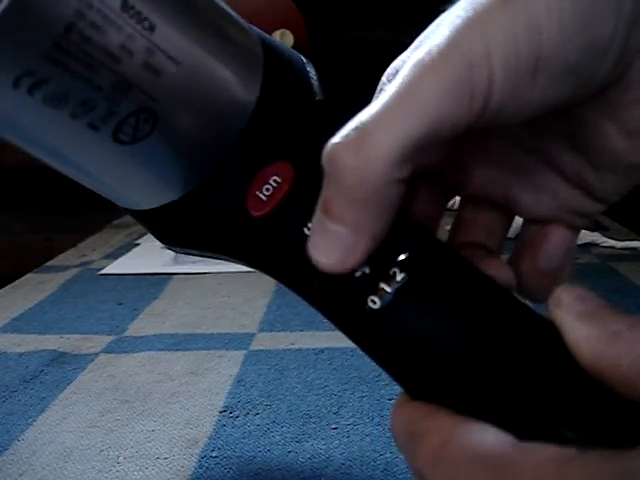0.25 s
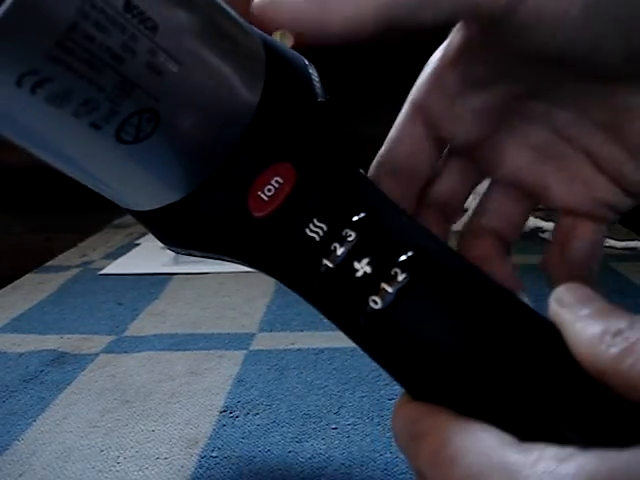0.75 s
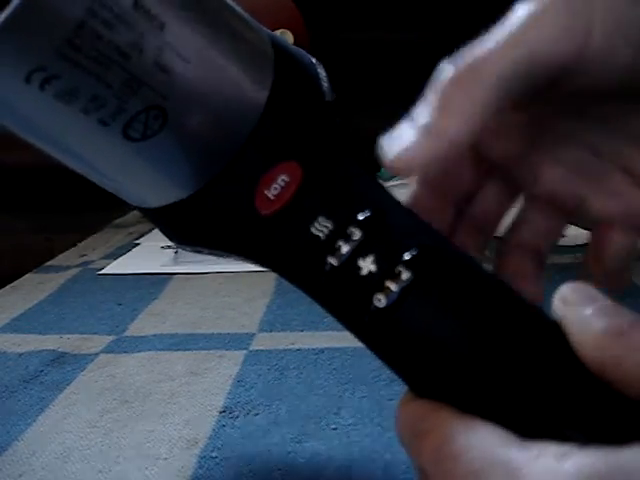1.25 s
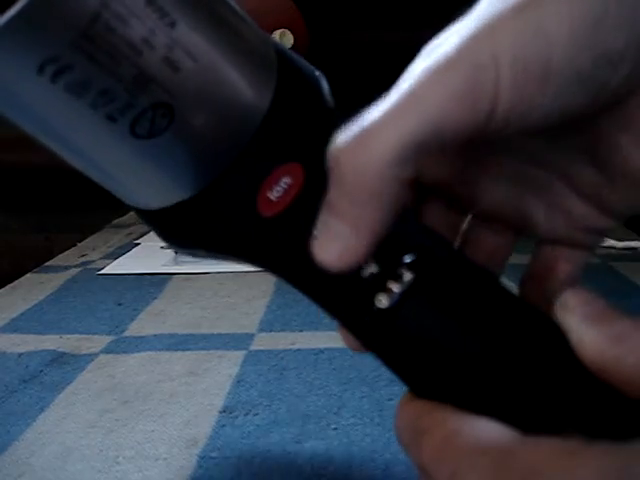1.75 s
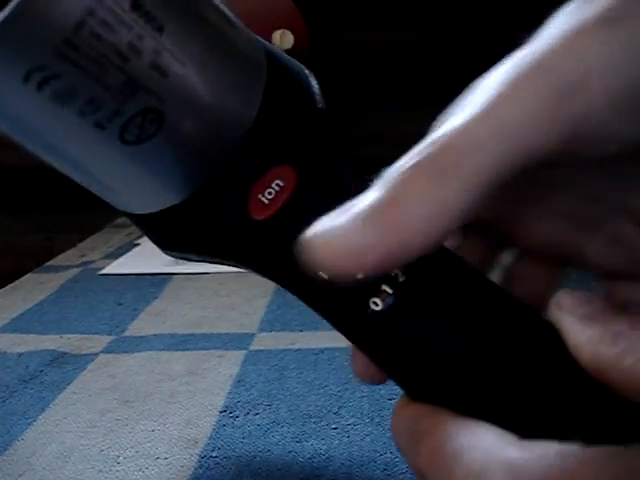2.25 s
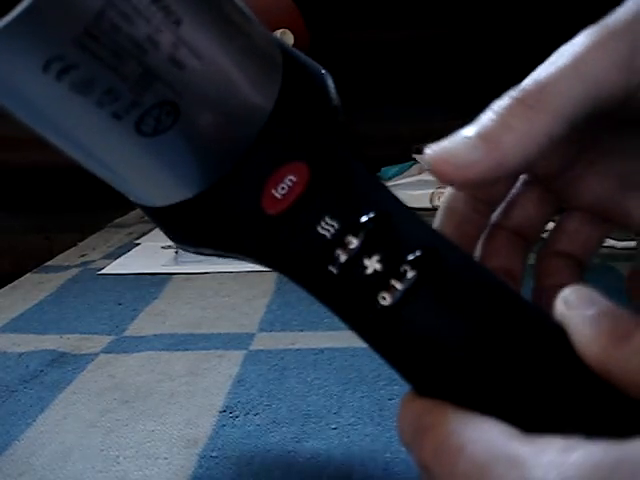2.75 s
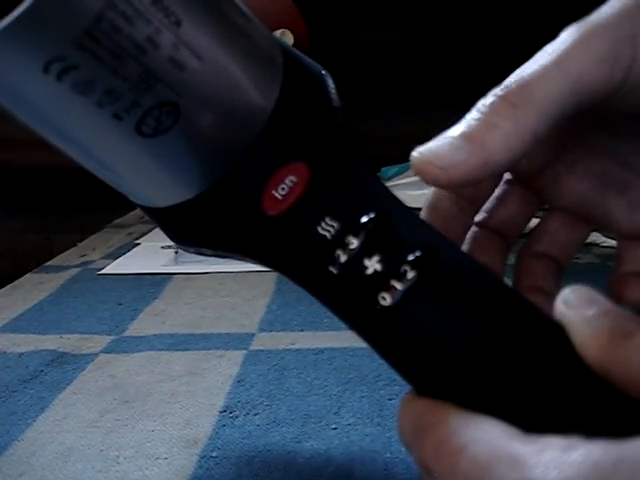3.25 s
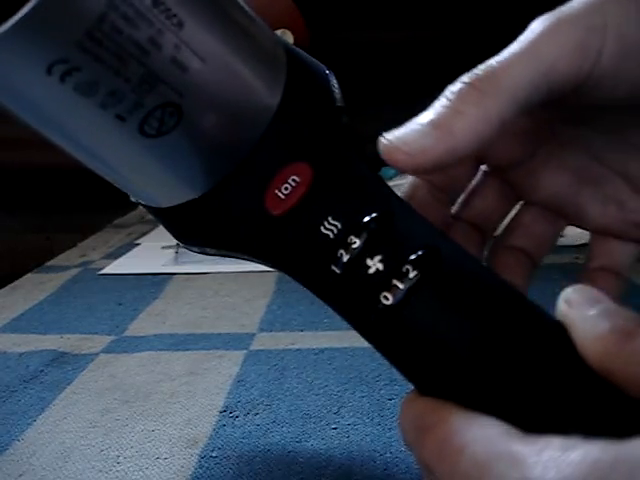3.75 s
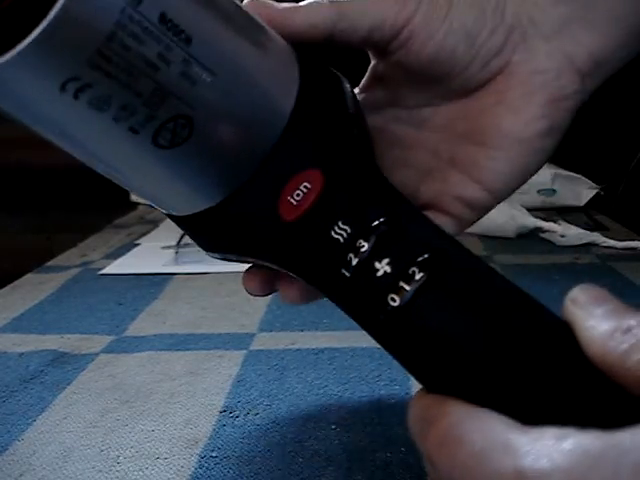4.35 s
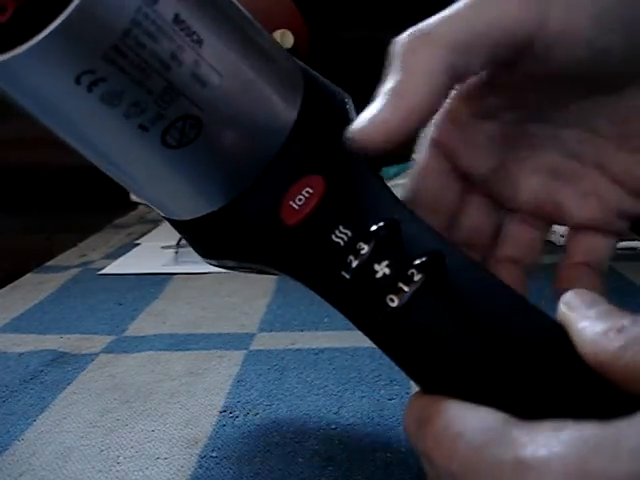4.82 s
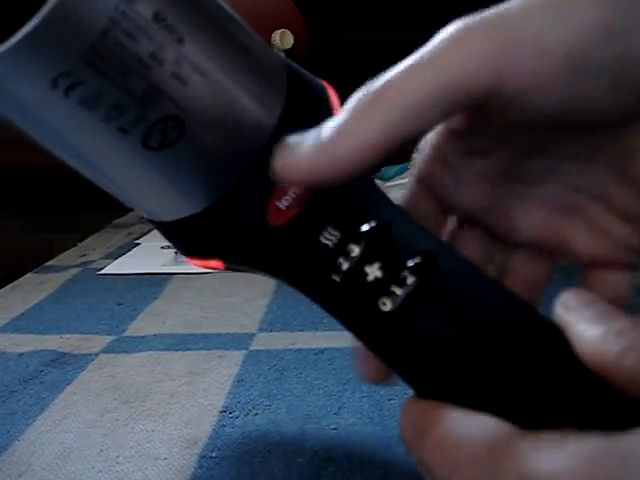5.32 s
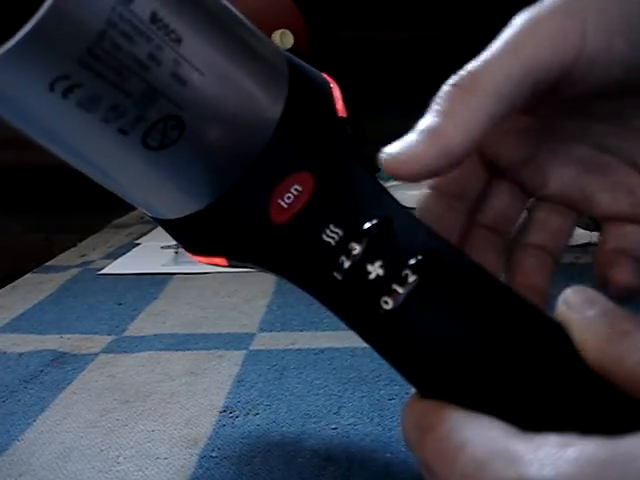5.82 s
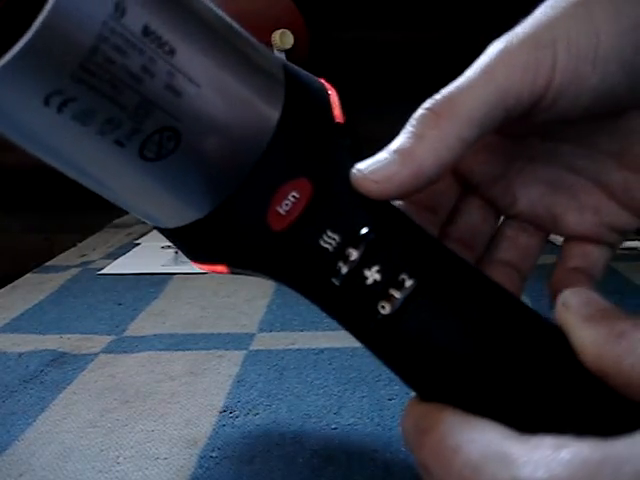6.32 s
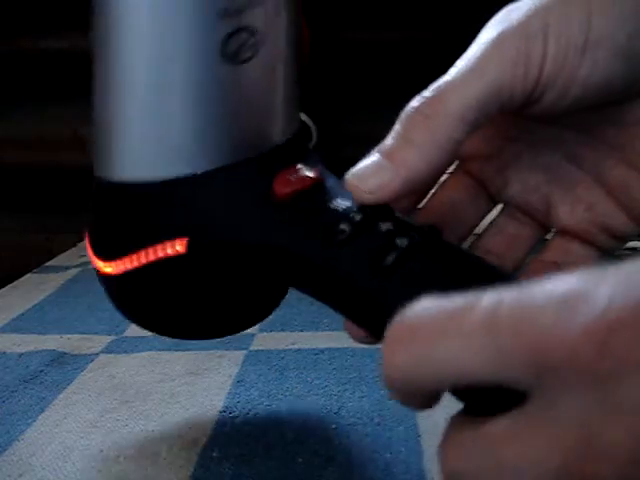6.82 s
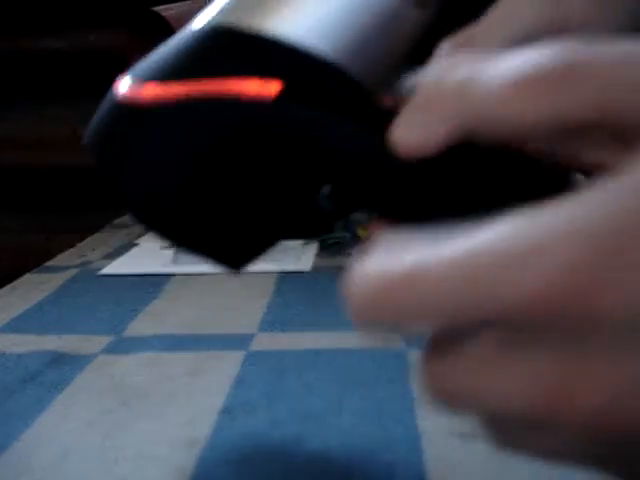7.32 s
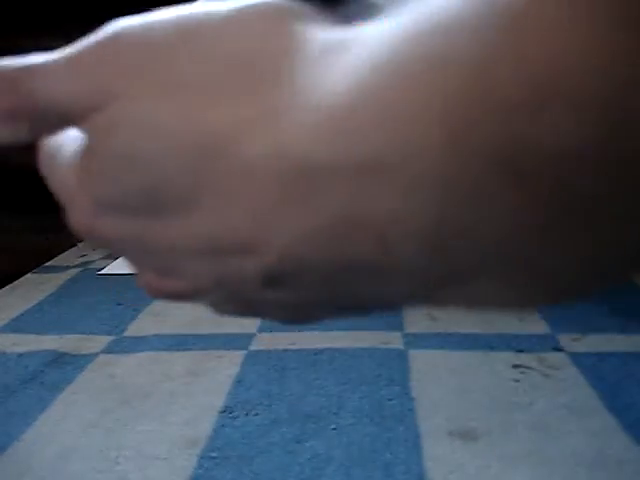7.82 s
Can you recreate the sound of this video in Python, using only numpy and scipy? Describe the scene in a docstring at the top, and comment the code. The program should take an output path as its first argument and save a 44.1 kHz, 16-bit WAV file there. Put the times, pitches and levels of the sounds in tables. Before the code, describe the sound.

A hair dryer is already running on high very close to a small microphone in a room: a strong, slightly wavering motor whine with a noisy whistle, inside broad rushing air. At about 0.5 s it is switched down, and the whine slides smoothly lower, settling by roughly 1.5-2 s. The lower whir holds steady with a faint rough beating, while soft dull handling bumps come irregularly, mostly from 1.8 to 4.6 s. Around 4.1-4.6 s a hand near the inlet makes the whistle swell, then drop out briefly. At 5.1 s a hard button snap bursts out and the fan ducks with a thump; a tight cluster of lighter clicks follows at 5.3 s. The fan continues. From 6.7 s the inlet turns to the microphone: hollow, boomier, less bright, with narrow airy whistles at 6.7, 7.0-7.3 and 7.7-8.0 s as a hand cups it. It is still running at the end.

```python
"""A hand-held hair dryer close to a small microphone indoors, the same signal on both channels.
Rotor sines and a noisy whistle stand out of coloured noise, the rushing air; soft low bumps come and go.
It is switched down and the fan coasts to a lower speed; later a hand hovers beside the inlet.
A button snaps as short pulses, and a limiter ducks on the snap. Then the inlet is turned to the
microphone and a hand cups over it: the gap sings as narrow noise."""
import sys
import numpy as np
from scipy import signal
from scipy.fft import rfft, irfft, next_fast_len
from scipy.io import wavfile

SR = 44100
rng = np.random.default_rng(int(sys.argv[2]) if len(sys.argv) > 2 else 0)


def store_pcm(level_fs):
    """Save levels as 16-bit WAV."""
    pcm = np.round(np.clip(level_fs, -1, 1) * 32767).astype(np.int16)
    wavfile.write(sys.argv[1], SR, np.atleast_2d(pcm).T)


N = 355887
T = np.arange(N) / SR

# Shaft speed on the low step, shifting with the air load: time_s, speed_hz
LOW_STEP_SPEED = [(0, 178.1), (3, 178.15), (4, 178.0), (4.5, 177.5), (5.5, 178.0), (6.5, 178.0), (7, 178.6),
                  (7.6, 178.5), (8.07, 178.0)]
# Aim of the dryer: time_s, facing (0 side-on, 1 inlet to the microphone)
AIM = [(0, 0.024), (6.7, 0.064), (7.0, 0.71), (8.07, 1)]
# Two strongest rotor tones: time_s, order_4_rms_db, order_8_rms_db
MAIN_TONES = [(0, -25.5, -24.5), (.6, -26.5, -26), (.72, -35.5, -25.5), (1.05, -31, -28),
              (1.35, -34.5, -29.5), (2.0, -30.5, -29.5), (3.9, -32, -28), (4.6, -33.5, -32),
              (5.0, -33.5, -27), (5.4, -35, -30), (6.6, -33.5, -28.5), (6.77, -32, -32), (6.9, -38, -33),
              (7.05, -35, -44), (7.35, -28.5, -34), (7.6, -33.5, -36), (8.07, -27, -39)]
# Weaker rotor tones: shaft_order, high_rms_db, low_rms_db, facing_rms_db, coasting_dip_db, waver_db
WEAK_TONES = [(1, -61, -59.5, -56, 7, 1.8), (2, -49, -62, -60, 5, 5), (5, -54, -39.5, -41, 3, 2.5),
              (6, -60, -49, -47.5, 4, 2), (7, -35, -35, -63.5, 17, 1), (10, -57, -57.5, -54, 0.5, 4),
              (12, -46, -40.5, -45, 2, 3.5), (16, -56, -45, -45, 0.5, 2), (20, -52.5, -49.5, -49.5, 0.1, 2),
              (24, -44.5, -48, -49, 2, 3), (25, -61, -48.5, -60, 2, 4.5), (30, -45, -51, -58.5, 6, 5)]
# Rushing air before the treble share: time_s, level_2600_to_5000_hz_db, bass_share_db
AIR_LEVEL = [(0.0, -28, -7), (.45, -29, -5.5), (1.2, -30.5, -1), (2.56, -28, 1.5), (3.71, -28, 1.5),
             (4.54, -27.5, 2.5), (4.72, -29, 2), (4.95, -28.5, 4), (5.3, -28.5, -1.5), (6.7, -29.5, 2),
             (7.33, -32.5, 4), (7.4, -31, 4), (8.07, -29.5, 5.5)]
# Relative spectral density of the air: frequency_hz, side_on_db, facing_db
AIR_COLOUR = [(100, -33, -48), (168, -21.5, -30), (264, -14.5, -17.5), (450, -5.5, -10.5), (626, -6.5, -13),
              (870, -4.5, 5), (1090, -1.5, -7.5), (1550, 1.5, -2.5), (2400, 2, -7.5), (3200, -1.5, -6),
              (4300, -7.5, -9), (6900, -5.5, -11), (7460, -8.5, -15), (9700, -11.5, -17.5)]
# Resonances of casing and microphone: centre_hz, width_hz, side_on_db, facing_db
CASING_RESONANCES = [(483, 150, 1.5, 9.5), (1330, 180, -2, 4), (2110, 420, -4.5, 0), (2910, 280, 0.5, 1.5),
                     (3320, 180, -3.5, -5), (3670, 560, 3.5, 7), (4370, 220, 3, 0.5),
                     (5440, 1350, 4.5, 4.5), (8180, 1100, 2.5, 0)]
# Treble share of the air: high_step_db, low_step_db, facing_db
TREBLE_SHARE = (0.88, -1.36, -2.2)
# Noisy resonances, one row each: high_rms_db, low_rms_db, facing_rms_db, hover_change_db, waver_db
WHISTLE = (-36, -32, -41.5, -2, 0.54)
BOOM = (-44.5, -45, -31, -3, 2.5)
BARREL = (-34, -33.5, -55, 4, -0.1)
# Brief changes of the resonances, strongest with the hand near the inlet:
# centre_s, length_s, whistle_db, boom_db, barrel_db
SURGES = [(.65, .3, 1, 3, -2), (2.15, .3, -1.5, 3, -2), (3.0, 0.33, 2.5, -2, 1.5), (4.08, 0.16, 5, -4, 1.5),
          (4.327, 0.17, -17, -6, 3.5), (4.85, .3, 1.5, 2, -.5), (5.1, .2, 1.5, 8, 3),
          (6.6, 0.32, 0.5, 5.5, 2), (7.31, .25, 8.5, 2.5, 17), (7.577, 0.11, 12, 5.5, 9),
          (7.68, 0.13, 6.5, 0, 16), (7.887, 0.17, 7.5, 5, 0.5)]
# Soft low bumps: start_s, peak_db
BUMPS = [(.21, -54), (1.85, -49), (2.34, -41), (2.54, -51), (2.83, -50), (2.92, -45), (3.14, -50),
         (3.34, -44), (3.56, -46), (3.75, -48), (4.04, -48), (4.11, -50), (4.19, -40), (4.26, -48),
         (4.62, -50), (5.91, -50)]
# Rectified mains beating with rotor tones on the low step: shaft_order, offset_hz, side_on_rms_db, facing_rms_db
MAINS_BEATS = [(4, 50, -46.5, -42), (8, 50, -44.5, -58.5), (45, 50, -66, -71.5), (47, -50, -61.5, -68),
               (54, -50, -61.5, -70), (54, 50, -54.5, -62.5)]
# Button snaps: centre_s, peak_db, ring_hz, length_cycles
SNAPS = [(5.11265, -2, 2600, .22), (5.3031, -7, 5200, .5), (5.3083, -6.5, 3700, .4), (5.3167, -8, 3200, .4)]
# Singing gap between hand and inlet: start_s, end_s, first_hz, last_hz, rms_db
HAND_GAPS = [(6.695, 6.802, 2850, 3020, -32), (6.947, 7.303, 1740, 1610, -34.5),
             (7.24, 7.3, 5800, 5730, -37), (7.66, 8.02, 2846, 2940, -34.5)]

HIGH_STEP_HZ, SWITCH_S, COAST_S = 231.6, .462, .358
WHISTLE_ORDER_HIGH, WHISTLE_ORDER_LOW, WHISTLE_WIDTH_HZ = 5.67, 5.54, 22
BOOM_HZ, BOOM_WIDTH_HZ = 813.6, 285
BARREL_HZ, BARREL_WIDTH_HZ = 2189, 446
HOVER_START_S, HOVER_END_S, HOVER_FADE_S = 4.05, 4.65, .17
RUMBLE_RMS_DB, RUMBLE_CUTOFF_HZ = -69.5, 151
BUMP_RISE_S = .0029
HUM_HZ, HUM_PEAK_DB = 101, -70.5
GAP_WIDTH_HZ, GAP_FADE_S = 210, .054
LIMIT_DB, SENSE_HZ, ATTACK_S = -10.4, 1200, .0012
FAST_RELEASE_DB_PER_S, DUCK_DB_PER_DB_OVER = 260, 1.6
SLOW_RELEASE_DB_PER_S, SLOW_SHARE = 2.5, .3
AMPLIFIER_OFFSET = -.028  # standing, full scale 1
COUPLING_HZ, CUTOFF_HZ = 3.5, 10000


def from_db(db):
    """Decibels to gain."""
    return 10 ** (np.asarray(db) / 20)


def rms_one(x):
    """Scale to rms 1."""
    return x / np.sqrt(np.mean(np.abs(x) ** 2))


def in_time(rows):
    """Table columns as curves over all samples."""
    time_s, *columns = np.transpose(rows)
    return [np.interp(T, time_s, column) for column in columns]


def blend(first, second, share):
    """From one value to another."""
    return first + (second - first) * share


def window(start_s, end_s, fade_s):
    """1 between start and end, fading to 0 outside."""
    return np.clip(np.minimum(T - start_s, end_s - T) / fade_s + 1, 0, 1) ** 2


def highpass(x, order, cutoff_hz):
    """Butterworth high-pass."""
    return signal.sosfilt(signal.butter(order, cutoff_hz, "high", fs=SR, output="sos"), x)


def lowpass(x, order, cutoff_hz):
    """Butterworth low-pass."""
    return signal.sosfilt(signal.butter(order, cutoff_hz, fs=SR, output="sos"), x)


def phase_of(hz):
    """Running phase of a frequency curve."""
    return 2 * np.pi * np.cumsum(hz * np.ones(N)) / SR


def tone(phase):
    """Sine of rms 1 with a random starting phase."""
    return np.sqrt(2) * np.sin(phase + rng.uniform(0, 2 * np.pi))


def drift(rate_hz):
    """Slow random curve of rms 1: noise through two equal poles, computed every 40 samples."""
    step = 40
    pole = np.exp(-2 * np.pi * rate_hz * step / SR)
    settle = 2000
    white = rng.standard_normal(N // step + settle + 2)
    slow = signal.lfilter([1], [1, -2 * pole, pole ** 2], white)[settle:]
    return np.interp(np.arange(N) / step, np.arange(len(slow)), rms_one(slow))


def resonant_noise(centre_hz, width_hz, order=3):
    """Low-passed complex noise shifted to a centre that may move; rms 1."""
    white = rng.standard_normal(N) + 1j * rng.standard_normal(N)
    slow = lowpass(white, order, width_hz / 2)
    return rms_one(np.real(slow * np.exp(1j * phase_of(centre_hz))))


def coast():
    """Share of the high step left in the speed: 1, then exponential decay after the switch."""
    return np.exp(-np.maximum(T - SWITCH_S, 0) / COAST_S)


def by_state(high, low, turned, facing):
    """A value that depends on fan step and aim."""
    return blend(blend(low, high, coast() ** .5), turned, facing)


def rotor_tones(speed_hz, facing):
    """Sines on multiples of the shaft speed, each wavering on its own."""
    shaft_phase = phase_of(speed_hz)
    coasting = (6.75 * coast() * (1 - coast()) ** 2) ** .7  # peaks at 1 during the coast
    out = np.zeros(N)
    for order, db in zip((4, 8), in_time(MAIN_TONES)):
        out += from_db(db + .65 * drift(4)) * tone(order * shaft_phase)
    for order, high_db, low_db, facing_db, dip_db, waver_db in WEAK_TONES:
        db = by_state(high_db, low_db, facing_db, facing) - dip_db * coasting
        out += from_db(db + waver_db * drift(8)) * tone(order * shaft_phase)
    return out


def air(facing):
    """One rush of noise in two colours, side-on and inlet facing, with moving bass and treble shares."""
    level_db, bass_db = in_time(AIR_LEVEL)
    treble_db = by_state(*TREBLE_SHARE, facing) + .68 * drift(25)
    size = next_fast_len(N)
    hz = np.maximum(np.fft.rfftfreq(size, 1 / SR), 1)
    white = rfft(rng.standard_normal(size))
    bass = 1 / (1 + (hz / 750) ** 4)
    treble = 1 / (1 + (5000 / hz) ** 4)
    bands = bass, 1 - bass - treble, treble
    gains = from_db(bass_db), 1, from_db(treble_db)
    reference = (hz > 2600) & (hz < 5000)
    colour_hz, *colours = np.transpose(AIR_COLOUR)
    views = []
    for view, db in enumerate(colours):
        colour_db = np.interp(np.log(hz), np.log(colour_hz), db)
        for centre_hz, width_hz, *peaks_db in CASING_RESONANCES:
            colour_db += peaks_db[view] / (1 + (2 * (hz - centre_hz) / width_hz) ** 2)
        rush = white * from_db(colour_db)
        rush /= np.sqrt(2 * np.sum(np.abs(rush[reference]) ** 2)) / size  # rms 1 in the reference band
        views.append(sum(gain * irfft(rush * band, size)[:N] for gain, band in zip(gains, bands)))
    return from_db(level_db + .22 * drift(3.7)) * blend(*views, facing)


def radiate(x):
    """Small cavities radiate no bass."""
    return highpass(x, 2, 400)


def resonances(speed_hz, facing):
    """Noise in narrow bands: whistle following the fan, boom of the inlet, hiss of the barrel."""
    hover = window(HOVER_START_S, HOVER_END_S, HOVER_FADE_S)
    surges_db = np.zeros((3, N))
    for centre_s, length_s, *changes_db in SURGES:
        surges_db += np.outer(changes_db, np.exp(-.5 * (2 * (T - centre_s) / length_s) ** 2))
    whistle_order = blend(WHISTLE_ORDER_LOW, WHISTLE_ORDER_HIGH, coast())
    sources = (resonant_noise(whistle_order * speed_hz, WHISTLE_WIDTH_HZ, order=1),
               resonant_noise(BOOM_HZ, BOOM_WIDTH_HZ),
               resonant_noise(BARREL_HZ, BARREL_WIDTH_HZ))
    out = np.zeros(N)
    for source, row, surge_db in zip(sources, (WHISTLE, BOOM, BARREL), surges_db):
        high_db, low_db, facing_db, hover_db, waver_db = row
        db = by_state(high_db, low_db, facing_db, facing)
        db = db + hover_db * hover + waver_db * drift(8) + surge_db
        out += from_db(db) * source
    return radiate(out)


def rumble():
    """Faint low-passed noise of room and amplifier."""
    return from_db(RUMBLE_RMS_DB) * rms_one(lowpass(rng.standard_normal(N), 2, RUMBLE_CUTOFF_HZ))


def bumps():
    """Each bump swells and sinks once, without ringing."""
    out = np.zeros(N)
    for start_s, peak_db in BUMPS:
        x = np.maximum(T - start_s, 0) / BUMP_RISE_S
        out += from_db(peak_db) * np.e * x * np.exp(-x)
    return out


def mains_beats(speed_hz, facing):
    """Rectified mains beats with rotor tones: sines offset from shaft orders, rising as the fan coasts down."""
    shaft_phase = phase_of(speed_hz)
    out = np.zeros(N)
    for order, offset_hz, side_db, facing_db in MAINS_BEATS:
        db = blend(side_db, facing_db, facing) + 2.5 * drift(1.5)
        out += from_db(db) * tone(order * shaft_phase + phase_of(offset_hz))
    return (1 - coast()) * out


def heater_hum():
    """Sine near twice the mains, from the heater on the low step."""
    return (1 - coast()) * from_db(HUM_PEAK_DB + 2 * drift(3)) * np.sin(phase_of(HUM_HZ))


def button():
    """Each snap is a sharp pull between two small pushes: a cosine under a Gaussian."""
    out = np.zeros(N)
    for centre_s, peak_db, ring_hz, length_cycles in SNAPS:
        cycles = (T - centre_s) * ring_hz
        out -= from_db(peak_db) * np.cos(2 * np.pi * cycles) * np.exp(-.5 * (cycles / length_cycles) ** 2)
    return out


def hand_gaps():
    """The gap between hand and inlet sings: narrow noise gliding in pitch."""
    out = np.zeros(N)
    for start_s, end_s, first_hz, last_hz, rms_db in HAND_GAPS:
        hz = np.interp(T, [start_s, end_s], [first_hz, last_hz])
        song = resonant_noise(hz, GAP_WIDTH_HZ, order=2)
        out += from_db(rms_db) * window(start_s, end_s, GAP_FADE_S) * song
    return radiate(out)


def scene():
    """Sum of all sources, the same signal on both channels."""
    low_hz, = in_time(LOW_STEP_SPEED)
    facing = np.clip(in_time(AIM)[0], 0, 1)
    speed_hz = blend(low_hz, HIGH_STEP_HZ, coast())
    mono = rotor_tones(speed_hz, facing) + air(facing) + resonances(speed_hz, facing)
    mono += rumble() + bumps() + mains_beats(speed_hz, facing) + heater_hum()
    mono += button() + hand_gaps()
    return np.array([mono, mono])


def release(duck_db, rate_db_per_s):
    """Jump up with the input, fall at a constant rate in dB."""
    return np.maximum.accumulate(duck_db + rate_db_per_s * T) - rate_db_per_s * T


def record(dry):
    """Limiter with two releases on signal plus offset, so each duck thumps; then coupling and treble cutoff."""
    sensed = highpass(dry[0], 1, SENSE_HZ)  # it listens to the treble
    over_db = np.maximum(20 * np.log10(np.abs(sensed) + 1e-9) - LIMIT_DB, 0)
    target_db = DUCK_DB_PER_DB_OVER * over_db
    fast_db = release(target_db, FAST_RELEASE_DB_PER_S)
    slow_db = release(SLOW_SHARE * target_db, SLOW_RELEASE_DB_PER_S)
    pole = np.exp(-1 / (ATTACK_S * SR))
    duck_db = signal.lfilter([1 - pole], [1, -pole], np.maximum(fast_db, slow_db))
    limited = (dry + AMPLIFIER_OFFSET) * from_db(-duck_db) - AMPLIFIER_OFFSET
    coupled = highpass(limited, 1, COUPLING_HZ)
    return signal.sosfilt(signal.ellip(12, .3, 70, CUTOFF_HZ, fs=SR, output="sos"), coupled)


dry = scene()
out = record(dry)
store_pcm(out)
```